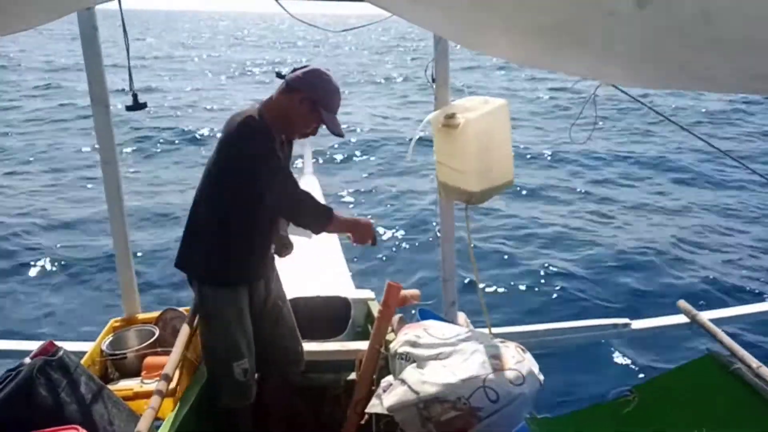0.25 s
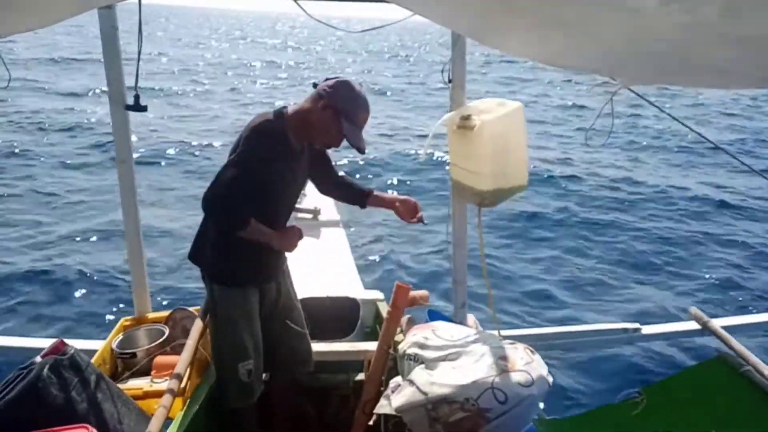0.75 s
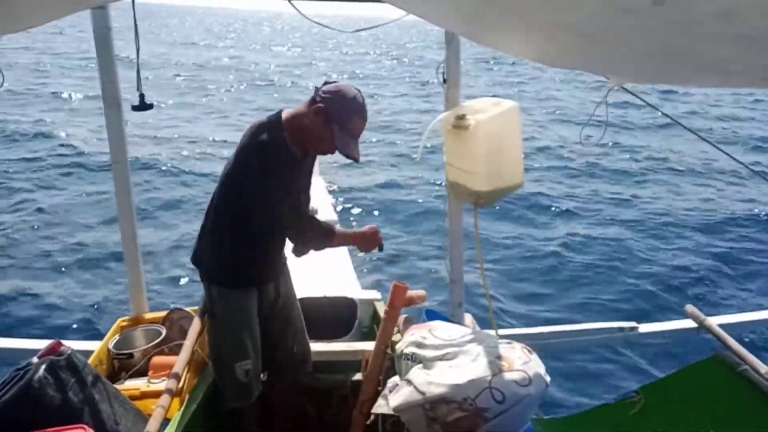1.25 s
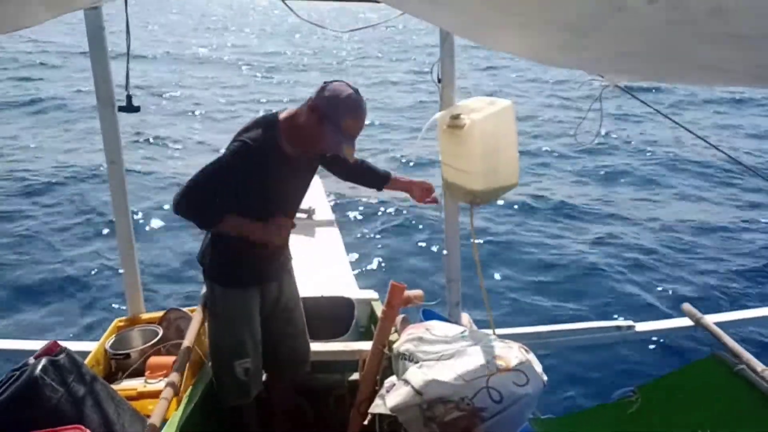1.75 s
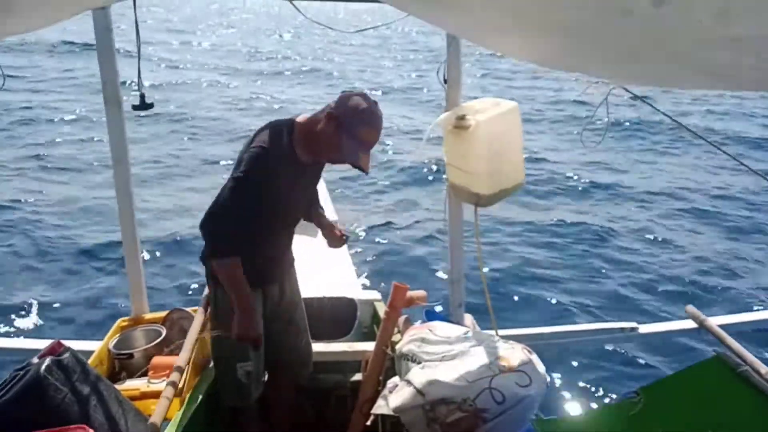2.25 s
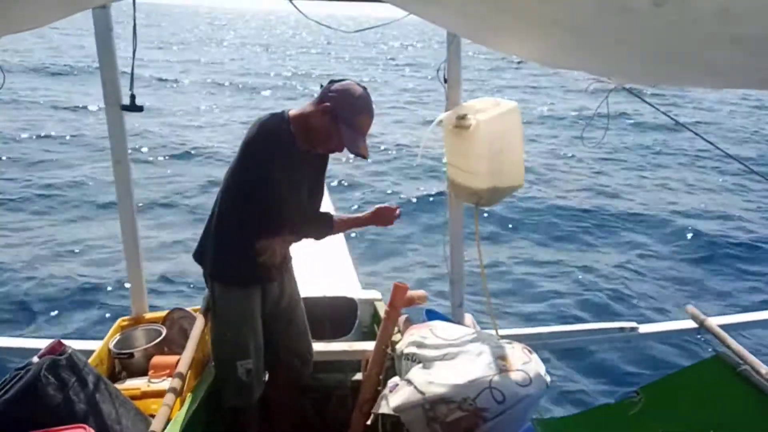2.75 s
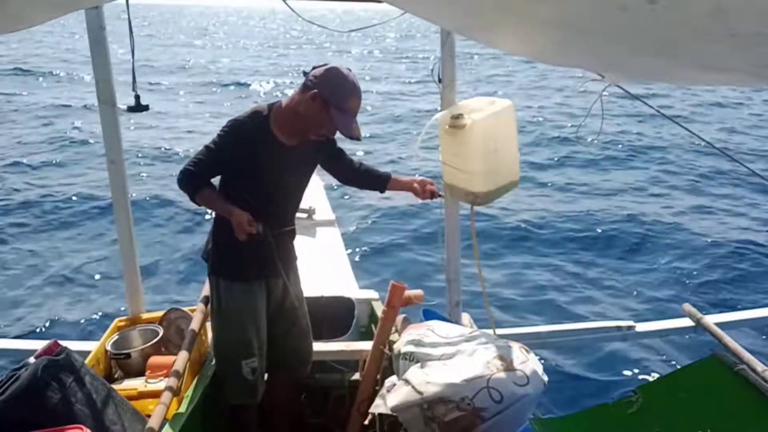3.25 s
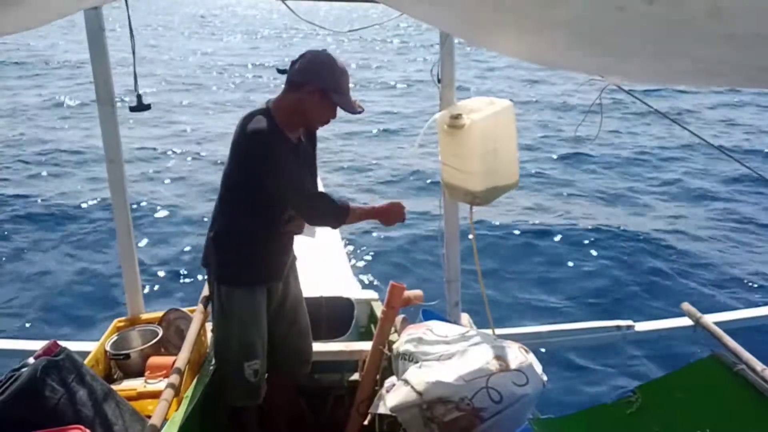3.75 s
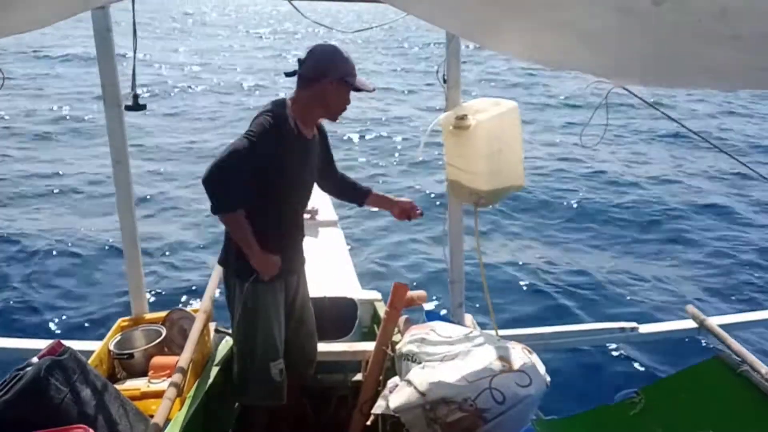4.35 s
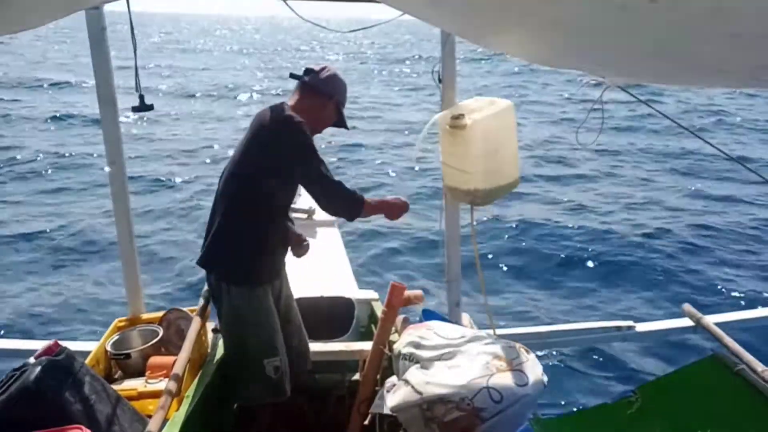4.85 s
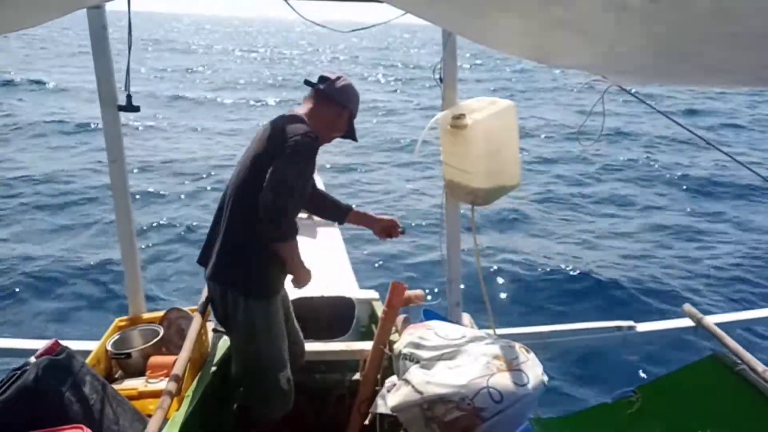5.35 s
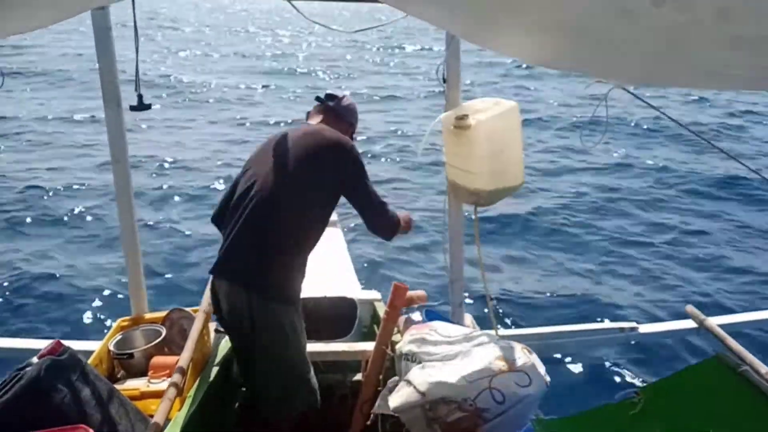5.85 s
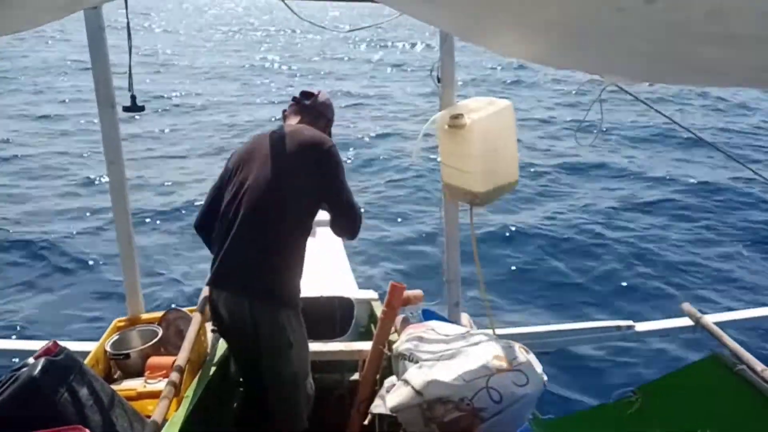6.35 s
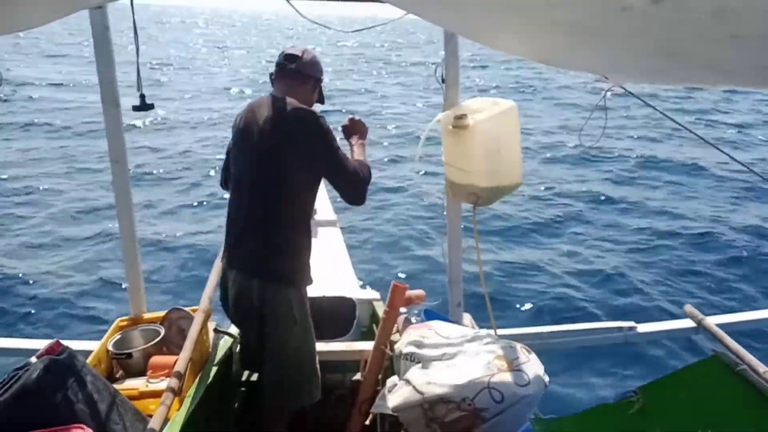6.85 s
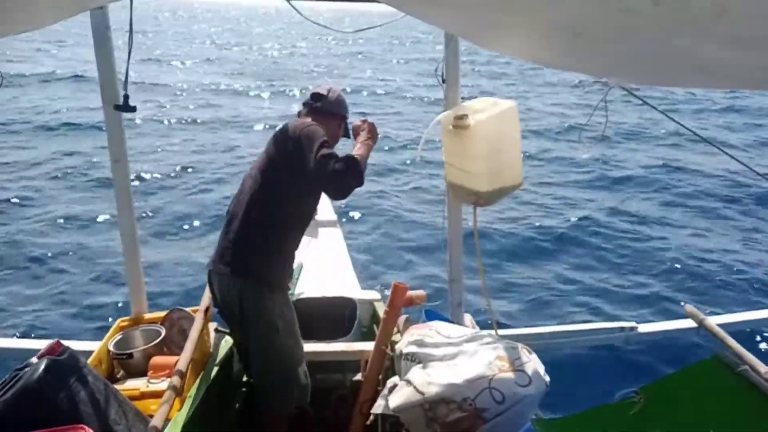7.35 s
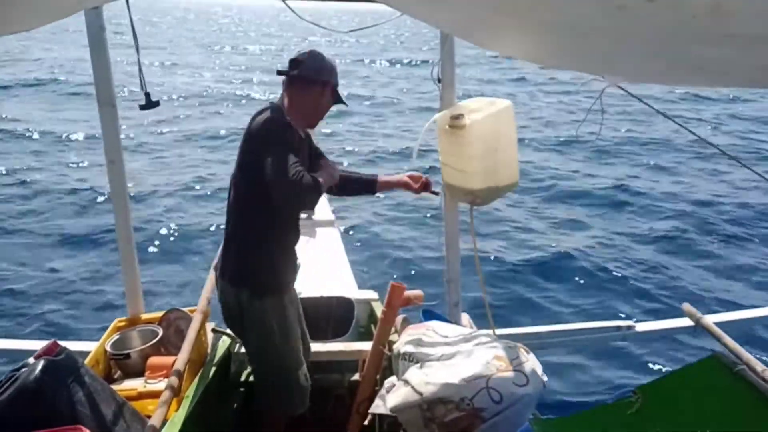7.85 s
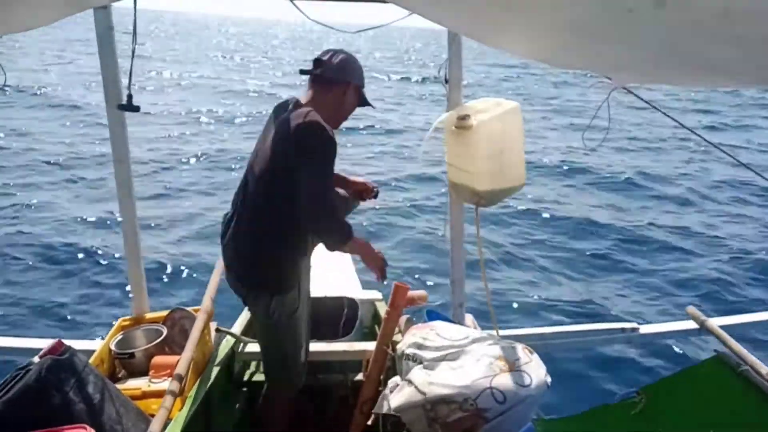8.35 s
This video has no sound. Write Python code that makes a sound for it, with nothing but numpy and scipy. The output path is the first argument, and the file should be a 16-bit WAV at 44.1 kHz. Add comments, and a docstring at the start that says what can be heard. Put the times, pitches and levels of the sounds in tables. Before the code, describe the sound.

Light wavelets gurgle, fizz and drip around a small wooden boat, its joint knocking, until a swell slaps the hull hard with deep booms.

```python
"""On the sea, a small outrigger boat drifts on a light chop.
Wavelets gurgle and fizz along the floats (bubble clouds, filtered noise) and throw drops (snaps, tiny bubbles).
Swells thud under the hull (sagging tones in a rumble); one group of waves slaps it hard (struck modes, splash).
A frame joint knocks as the boat rocks (noise bursts through short modes).
Everything reaches the microphone almost in mono, with no room around it."""
import sys
import numpy as np
from scipy import signal
from scipy.fft import rfft, irfft, next_fast_len
from scipy.io import wavfile

SR = 44100
rng = np.random.default_rng(int(sys.argv[2]) if len(sys.argv) > 2 else 0)


def to_wav(s):
    """Save 16-bit WAV."""
    ch = np.atleast_2d(s).T  # columns
    pcm = np.round(np.clip(ch, -1, 1) * 32767)  # PCM
    wavfile.write(sys.argv[1], SR, pcm.astype(np.int16))


N = 378805
TIME = np.arange(N) / SR

# swells bumping the hull: start_s, level_db, settled_pitch_hz
THUDS = [(0.233, -32.5, 101), (1.323, -40.5, 101), (1.501, -28.5, 129), (1.879, -25.5, 161),
         (2.427, -33.5, 99.5), (2.654, -38, 100), (3.132, -40.5, 89.5), (3.238, -26, 139),
         (3.275, -27.5, 114), (3.409, -41.5, 121), (3.468, -34, 122), (4.699, -29, 101), (5.569, -25.5, 89),
         (5.632, -22.5, 156), (5.788, -24.5, 132), (5.841, -25.5, 137), (5.998, -24, 101.5),
         (6.282, -23, 120), (6.502, -19, 124), (6.562, -14, 137), (6.599, -18, 100.4), (6.637, -21, 138),
         (6.823, -16, 138), (7.015, -17.5, 132), (7.096, -20, 150), (7.344, -28, 107), (7.709, -21, 92.5),
         (7.792, -25.5, 94), (7.974, -29, 80), (8.177, -34, 107), (8.328, -23, 90.4)]


def from_db(db):
    """Decibels to amplitude gain."""
    return 10 ** (np.asarray(db) / 20)


def to_db(power):
    """Power to decibels."""
    return 10 * np.log10(power + 1e-18)


def rms_one(x):
    """Scale to rms 1."""
    return x / np.sqrt(np.mean(x ** 2) + 1e-20)


def peak_one(x):
    """Scale to peak 1."""
    return x / np.max(np.abs(x))


def in_time(rows):
    """Interpolate each column of a curve at every sample."""
    time_s, *columns = np.transpose(rows)
    return [np.interp(TIME, time_s, column) for column in columns]


def add(track, start_s, sound):
    """Mix a sound into the track."""
    at = max(round(start_s * SR), 0)
    track[at:at + len(sound)] += sound[:max(N - at, 0)]


def coloured(x, spectrum):
    """Causal minimum-phase filter that follows a spectrum, built by folding its cepstrum."""
    size = 2 * next_fast_len(len(x) // 2 + 2048)
    hz, db = np.transpose(spectrum)
    grid_hz = np.maximum(np.arange(size // 2 + 1) * SR / size, 1)
    gain = from_db(np.interp(np.log(grid_hz), np.log(hz), db))
    cepstrum = irfft(np.log(gain))
    cepstrum[1:size // 2] *= 2
    cepstrum[size // 2 + 1:] = 0
    response = np.exp(rfft(cepstrum))
    return irfft(rfft(x, size) * response)[:len(x)]


def high_passed(x, corner_hz):
    """Remove the bass."""
    return signal.sosfilt(signal.butter(4, corner_hz, "high", fs=SR, output="sos"), x)


def brightened(x, corner_hz, gain_db):
    """Treble shelf."""
    treble = signal.sosfilt(signal.butter(1, corner_hz, "high", fs=SR, output="sos"), x)
    return x + (from_db(gain_db) - 1) * treble


def drift(rate_hz):
    """Slow random curve, rms 1: noise through two equal poles."""
    step = 40  # samples between computed points
    r = np.exp(-2 * np.pi * rate_hz * step / SR)
    noise = rng.standard_normal(N // step + 2002)
    slow = signal.lfilter([1], [1, -2 * r, r * r], noise)[2000:]  # start-up dropped
    return np.interp(np.arange(N) / step, np.arange(len(slow)), rms_one(slow))


def dying(t, t60):
    """Exponential decay, 60 dB per t60."""
    return np.exp(-np.log(1000) * t / max(t60, 1e-3))


def struck(modes, t, scatter_db, phase_spread=0):
    """Ring of a body: each blow reweights the modes; phase_spread (turns) starts them out of step."""
    ring = np.zeros(len(t))
    for hz, db, t60_s in modes:
        gain = from_db(db + scatter_db * rng.standard_normal())
        ring += gain * dying(t, t60_s) * np.sin(2 * np.pi * (hz * t + phase_spread * rng.random()))
    return ring


def slaps(contact_t60_s=0.023, splash_t60_s=0.1, splash_db=1.5, spray_t60_s=0.067, spray_band_hz=(1200, 4200)):
    """A wave face hits the side: hull modes boom, a dull splash builds as planks are wetted, spray flies."""
    # start_s, level_db, spray_level_db
    slap_events = [(3.267, -35, -44), (5.844, -36, -61), (6.278, -21, -57), (6.353, -27.5, -77),
                   (6.555, -27.5, -65), (6.757, -15.5, -38.5), (6.873, -17, -54), (6.897, -5.5, -27.5),
                   (6.933, -14, -48), (6.998, -25.5, -65), (7.198, -31.5, -35)]
    # hull modes: freq_hz, level_db, t60_s
    hull_modes = [(162, -8, .2), (241, 0, .18), (268, 1.5, .2), (392, -2, .19), (474, -2.5, .18),
                  (510, -5, .13), (587, -15, .12), (722, -10, .16), (805, -8.5, .16), (893, -14, .11),
                  (1220, -19, .15)]
    # splash spectrum: freq_hz, level_db
    splash_spectrum = [(40, -33), (290, 7.5), (820, -1.5), (1000, -14), (1700, -17), (4000, -64)]
    out, t = np.zeros(N), TIME[:SR // 3]
    wetting = 1 - dying(t, contact_t60_s)
    spray_band = signal.butter(2, spray_band_hz, "band", fs=SR, output="sos")
    for start_s, db, spray_db in slap_events:
        boom = peak_one(struck(hull_modes, t, scatter_db=5, phase_spread=0.95) * wetting)
        gush = rng.standard_normal(len(t)) * wetting
        splash = from_db(splash_db) * peak_one(coloured(gush * dying(t, splash_t60_s), splash_spectrum))
        spray = signal.sosfilt(spray_band, gush * dying(t, spray_t60_s))
        add(out, start_s, from_db(db) * peak_one(boom + splash) + from_db(spray_db) * peak_one(spray))
    return out


def thuds(swell_cycles=0.54, sag_cycles=0.41):
    """A swell traps an air pocket under the hull, which throbs for a few cycles and sags in pitch."""
    out, t = np.zeros(N), TIME[:SR // 6]
    for start_s, db, hz in THUDS:
        age = hz * t / swell_cycles
        cycles = hz * t + sag_cycles * (1 - np.exp(-age))
        throb = np.sin(2 * np.pi * cycles) * age ** 2 * np.exp(-age)
        add(out, start_s, from_db(db - 5.0) * peak_one(high_passed(throb, hz / 2)))
    return out


def heave_db(swell_db=2.5, churn_db=-8.5, churn_lead_s=0.017, churn_t60_s=0.24):
    """Rumble level: slow swell, plus churning that builds just before each thud and dies after it."""
    # slow heave under the hull: time_s, level_db
    swell = [(0.0, -55.5), (0.16, -59.5), (0.67, -72.5), (1.5, -58), (2.03, -74), (3.35, -57.5),
             (4.04, -67.5), (5.38, -68.5), (5.77, -39), (6.17, -54.5), (6.72, -35.5), (6.96, -34.5),
             (7.11, -50), (7.61, -57.5), (7.92, -47), (8.59, -51.5)]
    power = from_db(in_time(swell)[0] + swell_db) ** 2
    for start_s, db, _ in THUDS:
        build_up = np.exp(np.minimum(TIME - start_s, 0) / churn_lead_s)
        churn = build_up * dying(np.maximum(TIME - start_s, 0), churn_t60_s)
        power += (from_db(db + churn_db) * churn) ** 2
    return to_db(power)


def heave(level_db, hard_push_hz=95, calm_hz=105):
    """Lumpy rumble under the hull: deepest when calm; a hard push squeezes trapped air and sounds higher."""
    # freq_hz, level_db
    rumble_spectrum = [(20, -62.5), (40, -10.5), (70, 2.5), (115, 1), (170, -8), (260, -19), (450, -35.5),
                       (1200, -54), (4000, -85.5)]
    hard = np.interp(level_db, [-42, -33], [0, 1])
    calm = np.interp(level_db, [-60, -48], [1, 0])
    idle, gentle, squeezed = (rms_one(coloured(rng.standard_normal(N), rumble_spectrum)) for _ in range(3))
    deep = rms_one(signal.sosfilt(signal.butter(2, calm_hz, fs=SR, output="sos"), idle))
    high = high_passed(squeezed, hard_push_hz)
    rumble = np.sqrt(calm) * deep + np.sqrt(1 - hard - calm) * gentle + np.sqrt(hard) * high
    lumps_db = 2.8 * drift(18)
    return from_db(level_db - 1.5 + lumps_db) * rumble


def knocks(crack_t60_s=0.013, tail_t60_s=0.15, tail_db=-17, contact_t60_s=0.0031, crack_db=-4.0):
    """The joint slips with a sharp crack and ragged shiver; both excite a short hollow ring, shifted by load."""
    # start_s, level_db, treble_shelf_db
    knock_events = [(0.9517, -34.5, 0.5), (0.9802, -33, -2), (1.0092, -30, 0.5), (1.1298, -26, 1),
                    (1.158, -37, -9), (1.1735, -39.5, 3), (1.2786, -21, -1.5), (1.3063, -30.5, -22),
                    (1.3555, -34, 0.5), (1.979, -36, 30), (2.737, -29.5, 8.5), (2.7978, -29.5, -1.5),
                    (3.3078, -23.5, -4.5), (4.344, -40, -4), (4.4495, -27, -2), (4.66, -30, 1.5),
                    (4.9098, -26, 4.5), (5.2882, -30.5, -3.5), (5.308, -34, -4), (5.451, -31.5, 8),
                    (5.5123, -34, 5), (5.8213, -35, -11), (5.914, -34, -4), (6.4373, -32.5, -18),
                    (6.5171, -31.5, -5), (6.6784, -26.5, -1), (6.851, -27.5, -2), (7.269, -29.5, -12.5),
                    (7.895, -28.5, 1), (8.4865, -24, 2)]
    # joint modes: freq_hz, level_db, t60_s
    joint_modes = [(295, -2, 0.032), (1110, -1.5, 0.032), (1450, 2.5, 0.016), (1800, -6, 0.026),
                   (2250, -7.5, 0.034), (2560, -5.5, 0.022), (5850, -16, 0.03), (6700, -15, 0.025)]
    # crack spectrum: freq_hz, level_db
    crack_spectrum = [(2000, -1), (3000, 9.5), (4200, 10), (15000, -3)]
    out, t = np.zeros(N), TIME[:SR // 5]
    shiver = from_db(5.5 * np.minimum(drift(110), 2))
    hollow = signal.butter(2, [500, 930], "bandstop", fs=SR, output="sos")
    for start_s, db, treble_db in knock_events:
        grains = rng.laplace(size=len(t)) * (1 - dying(t, contact_t60_s))
        crack = grains * dying(t, crack_t60_s)
        ragged = np.roll(shiver, -round(start_s * SR))[:len(t)]
        tail = grains * from_db(tail_db) * ragged * dying(t, tail_t60_s)
        slip = crack + tail
        load = 1 + .028 * rng.standard_normal()
        modes = struck(joint_modes, t * load, scatter_db=5)
        ring = signal.sosfilt(hollow, signal.fftconvolve(slip, modes)[:len(t)])
        knock = rms_one(ring) + from_db(crack_db) * rms_one(coloured(slip, crack_spectrum))
        add(out, start_s, from_db(db) * peak_one(brightened(knock, 2300, treble_db)))
    return out


def breaking(start_s, curl_s, wash_s, growth, fade_db):
    """Wavelet envelope: grows as it curls, fades by fade_db per wash_s along the float, then drains away."""
    curled = np.clip((TIME - start_s) / curl_s, 0, 1)
    washing_s = np.maximum(TIME - start_s - curl_s, 0)
    draining = dying(np.maximum(washing_s - wash_s, 0), 0.18)
    return curled ** growth * from_db(-fade_db * washing_s / wash_s) * draining


def water_db(run_off_foam_db=3.5, run_off_gurgle_db=-8):
    """Gurgle and foam levels: run-off from the floats plus every breaking wavelet, summed as power."""
    # time_s, level_db
    run_off_curve = [(0.0, -95.5), (0.62, -46.5), (0.8, -62.5), (0.87, -79), (1.22, -74), (1.45, -55),
                     (1.84, -84.5), (2.27, -62.5), (3.2, -77.5), (3.85, -64.5), (4.04, -80.5),
                     (4.42, -79.5), (4.75, -68), (5.07, -77.5), (5.68, -72), (6.24, -87.5), (7.4, -69),
                     (8.11, -79), (8.59, -48)]
    # wavelets breaking on the floats: start_s, curl_s, wash_s, gurgle_level_db, foam_level_db
    wavelets = [(-0.03, 0.018, 0.15, -60, -46.5), (0.15, 0.032, 0.3, -93, -56),
                (0.291, 0.13, 0.16, -49, -73), (1.264, 0.12, 0.16, -82, -47),
                (2.042, 0.044, 0.18, -92, -56.5), (3.6, 0.054, 0.69, -85, -66),
                (4.569, 0.098, 0.18, -67, -59), (7.866, 0.18, 0.51, -41.5, -38)]
    run_off_db, = in_time(run_off_curve)
    gurgling = from_db(run_off_db + run_off_gurgle_db) ** 2
    foaming = from_db(run_off_db + run_off_foam_db) ** 2
    for start_s, curl_s, wash_s, gurgle_db, foam_db in wavelets:
        # in the curl, gurgle comes early and foam late
        gurgle_shape = breaking(start_s, curl_s, wash_s, growth=0.46, fade_db=16.5)
        foam_shape = breaking(start_s, curl_s, wash_s, growth=1.2, fade_db=17.5)
        gurgling += (from_db(gurgle_db) * gurgle_shape) ** 2
        foaming += (from_db(foam_db) * foam_shape) ** 2
    return to_db(gurgling), to_db(foaming)


def bubble_cloud(per_s, low_hz, high_hz, cycles, spread_db):
    """Bubbles of random size are born at random; each rings down 60 dB in some cycles; rms 1."""
    born = rng.random(N) < per_s / SR
    size_gain = from_db(spread_db * np.minimum(rng.exponential(1, N), 3))
    impulses = born * size_gain * rng.choice([-1, 1], N)
    pitches_hz = np.geomspace(low_hz, high_hz, 70)
    dealt, out = rng.integers(0, len(pitches_hz), N), np.zeros(N)
    for k, hz in enumerate(pitches_hz):
        r, w = np.exp(-np.log(1000) * hz / (cycles * SR)), 2 * np.pi * hz / SR
        own = impulses * (dealt == k) + 1e-18
        out += hz * signal.lfilter([1, -1], [1, -2 * r * np.cos(w), r * r], own)
    return rms_one(out)


def gurgle(level_db, small_wave_hz=900):
    """Bubbles over a smooth rush of folding water; only a big wave traps the largest, deepest ones."""
    # freq_hz, level_db
    gurgle_spectrum = [(150, -13.5), (350, 0.5), (600, 14.5), (900, 10.5), (1300, 12), (2000, -0.5),
                       (3200, -24), (8000, -63)]
    big = np.interp(level_db, [-49.5, -45.5], [0, 1])
    cloud = bubble_cloud(per_s=900, low_hz=380, high_hz=3000, cycles=70, spread_db=3.0)
    rush = .5 * rng.standard_normal(N)
    full = rms_one(coloured(cloud + rush, gurgle_spectrum))
    return from_db(level_db - 1.0) * (big * full + (1 - big) * high_passed(full, small_wave_hz))


def swarms(patchy_db=10.5, swarm_rate_hz=24):
    """Swarms of tiny like-sized bubbles flare and fade, each in its own narrow noise band; rms 1."""
    edges_hz, out = np.geomspace(1200, 9000, 36), np.zeros(N)
    grains = rng.laplace(size=(2, N))
    for k, band_hz in enumerate(zip(edges_hz, edges_hz[1:])):
        # neighbouring bands take different noise
        swarm = signal.sosfilt(signal.butter(2, band_hz, "band", fs=SR, output="sos"), grains[k % 2])
        out += swarm * from_db(patchy_db * np.minimum(drift(swarm_rate_hz), 2.5))
    return rms_one(out)


def foam(level_db, patter_db=4.0, lapping_db=7.5, swarms_db=-1, thick_top_db=-4):
    """A thin trickle laps in surges of patter and ringing bubbles; thick foam is an evener, duller fizz."""
    # freq_hz, level_db
    fizz_spectrum = [(900, -21), (1800, -8), (2800, -1), (4500, 2), (7000, 0), (15000, -2.5)]
    thick = np.interp(level_db, [-58, -45], [0, 1])
    uneven = 1 - thick / 2
    patter = rms_one(rng.laplace(size=N) * from_db(patter_db * uneven * drift(60)))
    lapping = from_db(lapping_db * uneven ** 2 * np.minimum(drift(12), 1))
    fizz = rms_one(coloured(patter + from_db(swarms_db) * uneven * swarms(), fizz_spectrum))
    return from_db(level_db + 1.84) * lapping * brightened(fizz, 7100, thick * thick_top_db)


def spurts(crack_t60_s=0.002, tail_db=-13, swarm_db=-2, landing_t60_s=0.0032):
    """Spray lands with a bright snap and ragged patter; a swarm of like-sized bubbles rings."""
    # start_s, level_db, patter_t60_s, bubble_pitch_hz
    spurt_events = [(0.511, -24.5, 0.035, 3350), (0.5546, -35.5, 0.23, 4100), (1.5715, -39, 0.11, 8200),
                    (1.703, -31.5, 0.065, 5740), (2.8254, -33, 0.11, 2760), (2.868, -43.5, 0.18, 14000),
                    (3.007, -42, 0.23, 14000), (3.268, -32, 0.055, 5700), (3.5222, -29, 0.061, 9100),
                    (3.566, -31.5, 0.14, 13500), (4.795, -44, 0.12, 14600), (4.876, -41.5, 0.37, 14400),
                    (5.0123, -45, 0.098, 7800), (5.16, -40, 0.21, 2080), (5.356, -42, 0.095, 5270),
                    (5.5418, -45.5, 0.082, 3640), (5.6256, -41.5, 0.16, 7400), (5.6521, -42.5, 0.1, 6600),
                    (5.6827, -43.5, 0.037, 4870), (5.724, -36, 0.16, 13800), (5.82, -39.5, 0.06, 14800),
                    (6.002, -41.5, 0.074, 2560), (6.5722, -42, 0.03, 13900), (6.708, -30, 0.039, 8900),
                    (7.165, -27, 0.1, 5500), (7.62, -39.5, 0.32, 14500), (7.667, -32, 0.52, 14700),
                    (7.7715, -18, 0.073, 3920)]
    # freq_hz, level_db
    spray_spectrum = [(300, -59), (1200, -9), (2200, -10.5), (3500, -9.5), (6500, -2.5), (15000, -9)]
    out, t = np.zeros(N), TIME[:SR // 4]
    lumps = from_db(3.5 * np.minimum(drift(70), 2))
    for start_s, db, t60_s, hz in spurt_events:
        ragged = np.roll(lumps, -round(start_s * SR))[:len(t)]
        patter = from_db(tail_db) * ragged * dying(t, t60_s)
        grains = rng.laplace(size=len(t)) * (dying(t, crack_t60_s) + patter)
        swarm = signal.lfilter(*signal.iirpeak(hz, 4, fs=SR), grains)
        spurt = peak_one(coloured(grains, spray_spectrum)) + from_db(swarm_db) * peak_one(swarm)
        landing = 1 - dying(t, landing_t60_s)
        add(out, start_s, from_db(db + 2.5) * peak_one(spurt * landing))
    return out


def bubble_cluster(hz, length_s, pitch_spread, cycles, half_rise_per_s, count):
    """Bubbles of related size are released in turn; each rings briefly and rises in pitch; peak 1."""
    age_s = np.maximum(TIME[:SR // 3] - length_s * rng.beta(1, 2, (count, 1)), 0)
    pitches_hz = hz * np.exp(pitch_spread * rng.standard_normal((count, 1)))
    turns = pitches_hz * age_s * (1 + half_rise_per_s * age_s)
    rings = np.sin(2 * np.pi * turns) * (1 - np.exp(-turns)) * dying(turns, cycles)
    return peak_one(rng.random(count) @ rings)


def sloshes(pitch_spread=0.223, cycles=38, half_rise_per_s=0.71):
    """Water sloshing along hull and floats folds in a crowd of large bubbles."""
    # start_s, level_db, pitch_hz, length_s
    slosh_events = [(1.553, -57, 770, 0.09), (1.684, -50, 882, 0.047), (1.92, -40.5, 244, 0.078),
                    (2.336, -53, 830, 0.063), (2.458, -46, 259, 0.17), (2.557, -46.5, 2290, 0.048),
                    (3.739, -55, 1540, 0.083), (3.904, -57.5, 1190, 0.11), (5.153, -62.5, 940, 0.084),
                    (5.168, -55, 350, 0.13), (5.828, -43, 984, 0.052), (5.964, -53.5, 1590, 0.08),
                    (7.03, -32.5, 275, 0.15), (7.067, -39, 678, 0.13)]
    out = np.zeros(N)
    for start_s, db, hz, length_s in slosh_events:
        cluster = bubble_cluster(hz, length_s, pitch_spread, cycles, half_rise_per_s, count=44)
        add(out, start_s, from_db(db) * cluster)
    return out


def drips(length_s=0.022, pitch_spread=0.13, cycles=90, half_rise_per_s=3.5):
    """Each drop falling back into the sea leaves a handful of tiny ringing bubbles."""
    # start_s, level_db, bubble_pitch_hz
    drip_events = [(0.187, -57, 4460), (2.2026, -43.5, 5000), (2.237, -43, 5720), (2.277, -37.5, 6100),
                   (2.279, -46, 4160), (2.359, -33.5, 7200), (2.409, -39, 5230), (3.0886, -44, 6900),
                   (3.675, -40.5, 4340), (4.211, -35, 5940), (4.501, -41.5, 5050), (6.9756, -49, 4920)]
    out = np.zeros(N)
    for start_s, db, hz in drip_events:
        cluster = bubble_cluster(hz, length_s, pitch_spread, cycles, half_rise_per_s, count=12)
        add(out, start_s, from_db(db) * cluster)
    return out


def plops(cycles=42, half_rise_per_s=1.07):
    """A large single bubble rings and rises in pitch on its way to the surface."""
    # start_s, level_db, initial_pitch_hz
    plop_events = [(0.223, -58.5, 1630), (0.256, -46, 1400), (0.348, -63, 940), (0.439, -56, 930),
                   (0.494, -48, 880), (0.527, -44, 1220), (0.602, -50, 1440), (1.494, -52, 778),
                   (2.964, -69, 1700), (3.212, -55, 700), (7.266, -41, 1300), (7.945, -43.5, 719),
                   (7.991, -49, 1230)]
    out, t = np.zeros(N), TIME[:SR // 6]
    for start_s, db, hz in plop_events:
        envelope = peak_one(dying(t, cycles / hz) * (1 - dying(t, 0.045)))
        ring = np.sin(2 * np.pi * hz * t * (1 + half_rise_per_s * t))
        add(out, start_s, from_db(db + 8.0) * envelope * ring)
    return out


def sea(level_db=-75.5):
    """Steady background of the sea: coloured noise."""
    # freq_hz, level_db
    sea_spectrum = [(20, -10), (300, -5), (700, -6.5), (1500, -12), (4000, -42), (15000, -22.5)]
    return from_db(level_db) * rms_one(coloured(rng.standard_normal(N), sea_spectrum))


def stereo_smear(x, smear_t60_s=0.035):
    """A faint, noise-smeared copy of the sound, opposite in left and right, adds slight stereo width."""
    # side level against the middle: freq_hz, level_db
    width_spectrum = [(500, -44), (1100, -23), (8000, -22.5)]
    t = TIME[:SR // 20]
    smear = rng.standard_normal(len(t)) * dying(t, smear_t60_s)
    return coloured(signal.fftconvolve(x, smear / np.linalg.norm(smear))[:N], width_spectrum)


def scene():
    """All sources sit in the middle, with only a trace of width."""
    gurgle_db, foam_db = water_db()
    boat = slaps() + thuds() + heave(heave_db()) + knocks() + sloshes()
    water = gurgle(gurgle_db) + foam(foam_db) + spurts() + drips() + plops() + sea()
    mid = boat + water
    side = stereo_smear(mid)
    return np.array([mid + side, mid - side])


def record(dry, cutoff_hz=15700):
    """The microphone port has a deep notch in the treble; a steep low-pass cuts the top."""
    # freq_hz, gain_db
    microphone_response = [(20, 1.5), (7300, -1), (8200, -6), (9300, -18), (11300, -11), (12500, -2.5),
                           (15000, 3)]
    heard = np.array([coloured(channel, microphone_response) for channel in dry])
    return signal.sosfilt(signal.ellip(10, .2, 80, cutoff_hz, fs=SR, output="sos"), heard)


dry = scene()
out = record(dry)
to_wav(out)
```